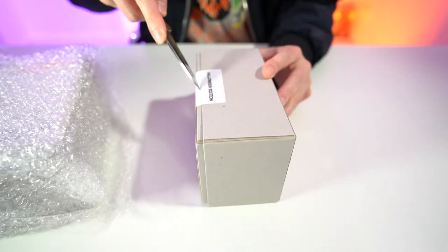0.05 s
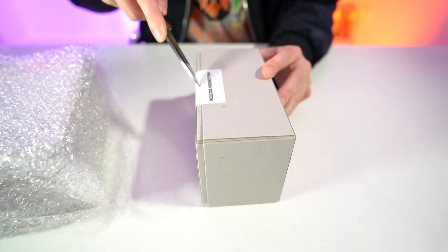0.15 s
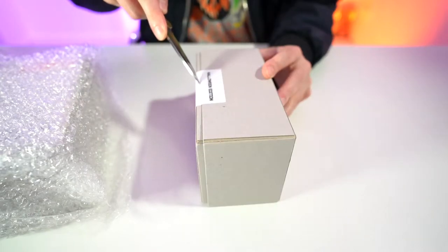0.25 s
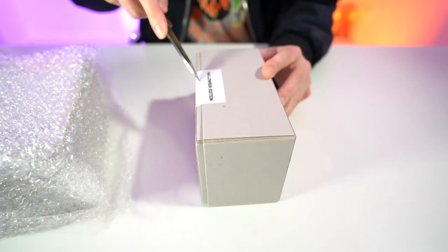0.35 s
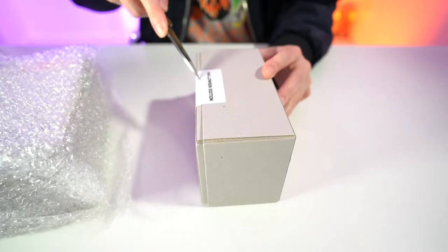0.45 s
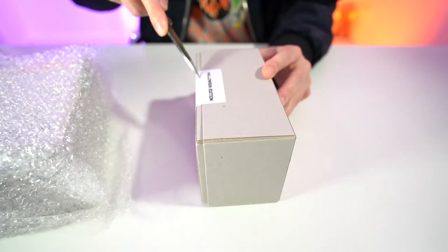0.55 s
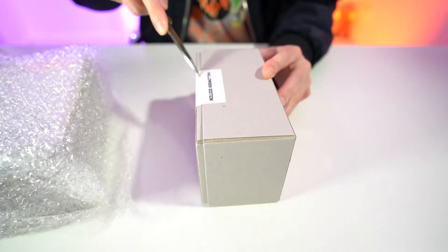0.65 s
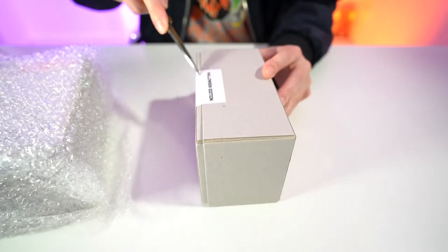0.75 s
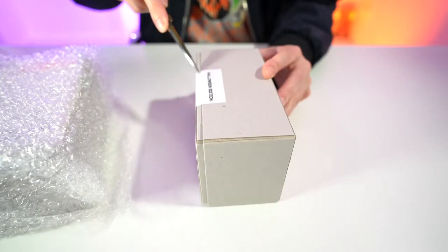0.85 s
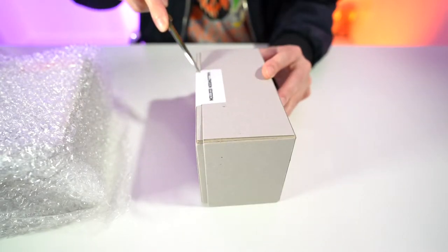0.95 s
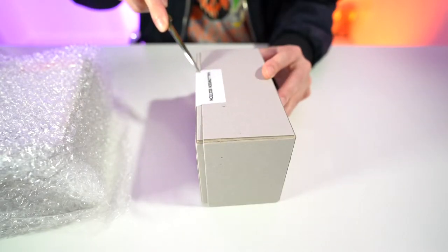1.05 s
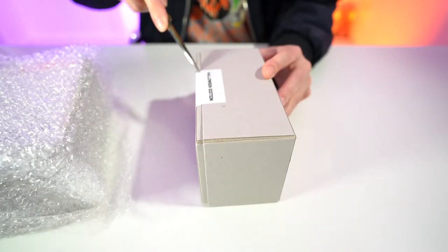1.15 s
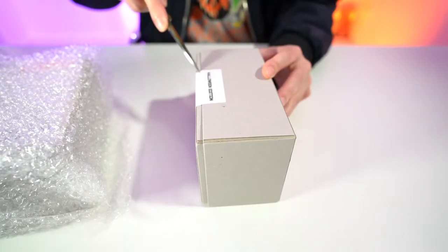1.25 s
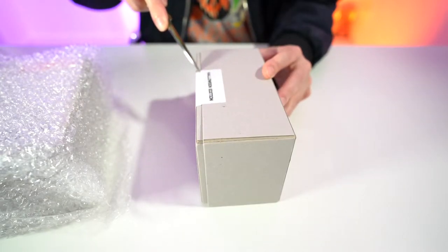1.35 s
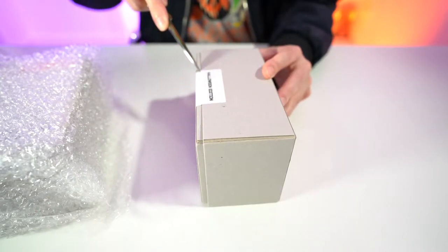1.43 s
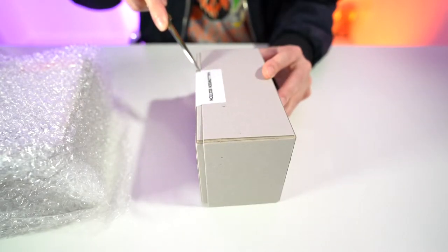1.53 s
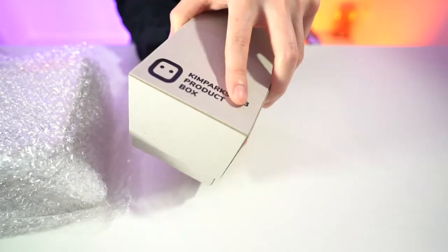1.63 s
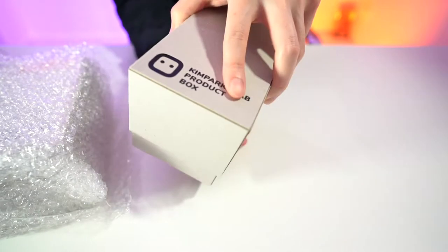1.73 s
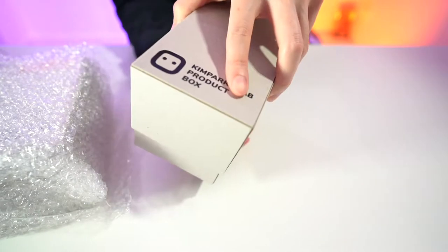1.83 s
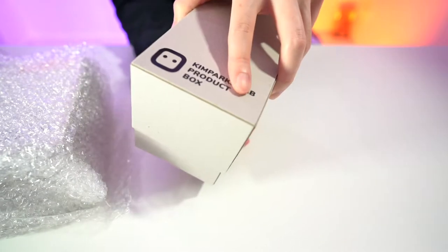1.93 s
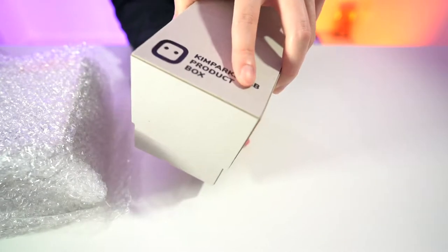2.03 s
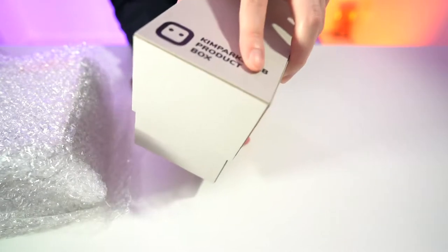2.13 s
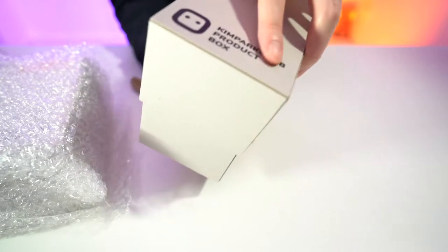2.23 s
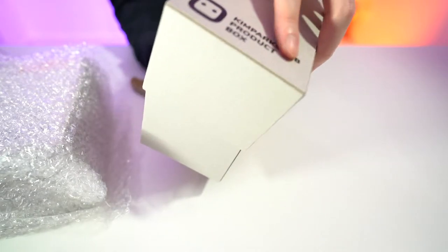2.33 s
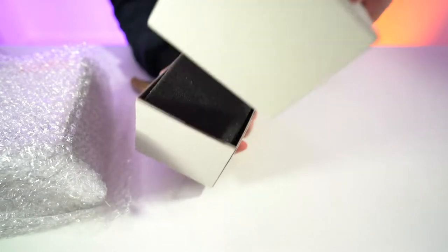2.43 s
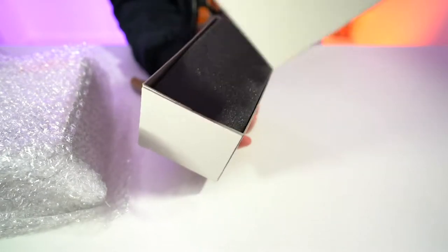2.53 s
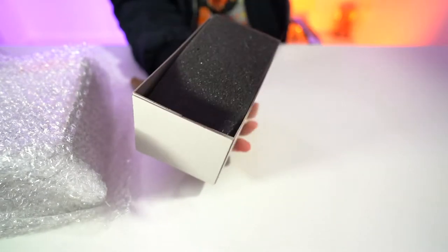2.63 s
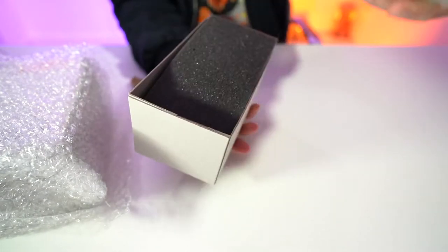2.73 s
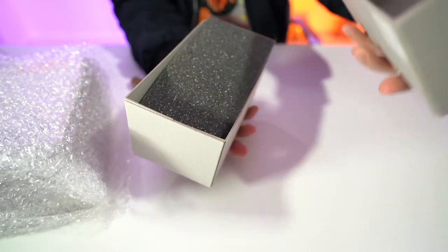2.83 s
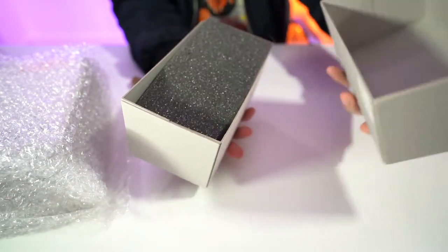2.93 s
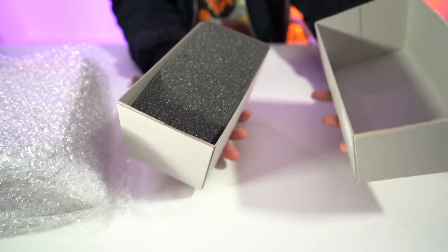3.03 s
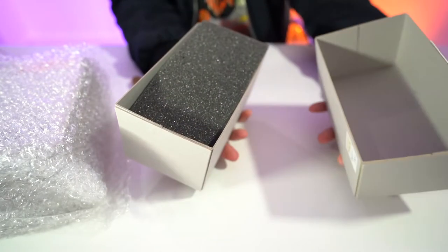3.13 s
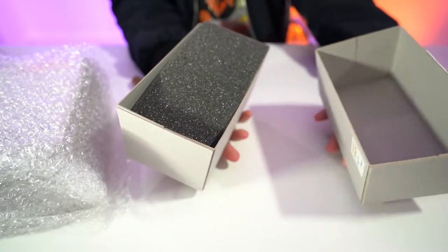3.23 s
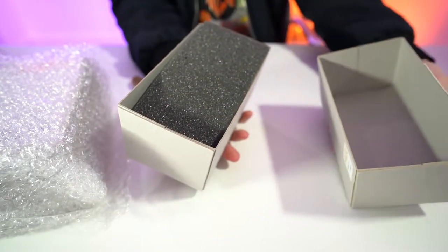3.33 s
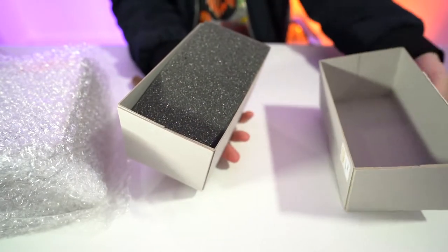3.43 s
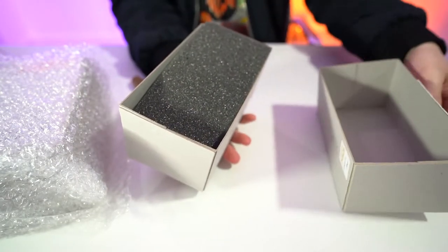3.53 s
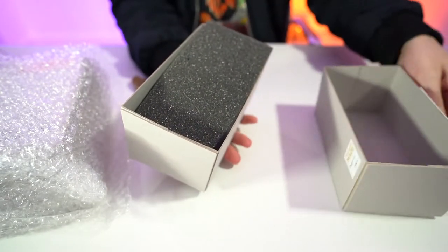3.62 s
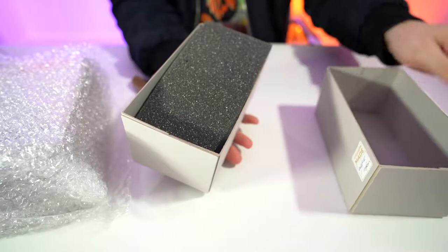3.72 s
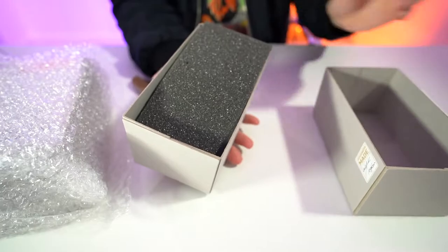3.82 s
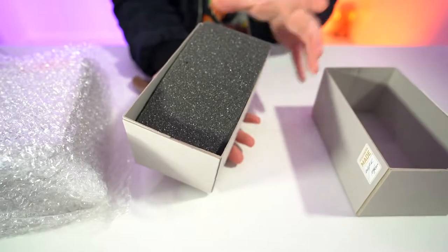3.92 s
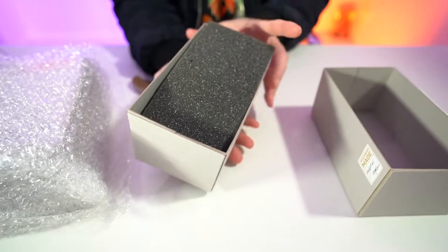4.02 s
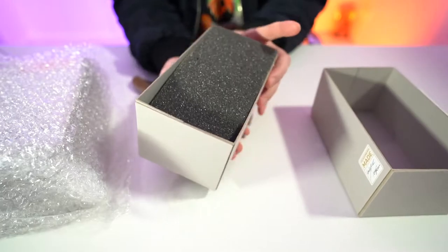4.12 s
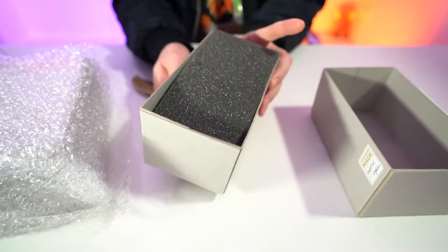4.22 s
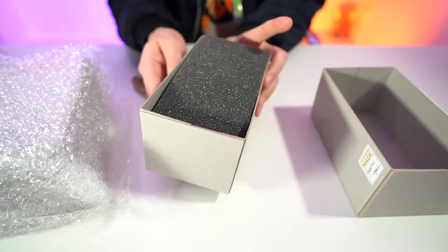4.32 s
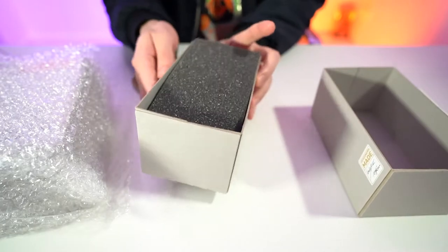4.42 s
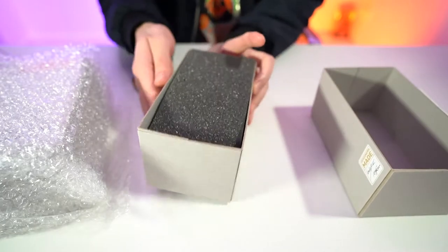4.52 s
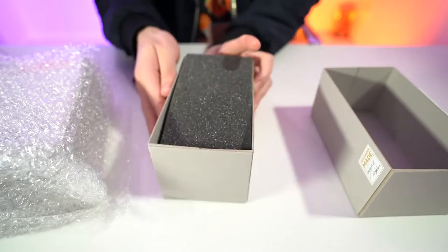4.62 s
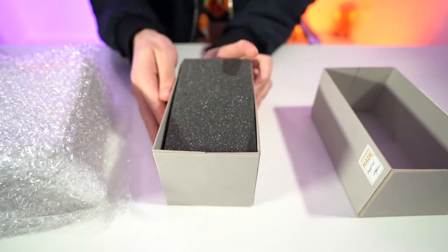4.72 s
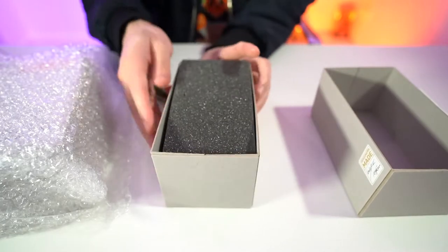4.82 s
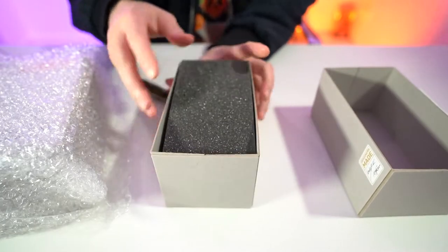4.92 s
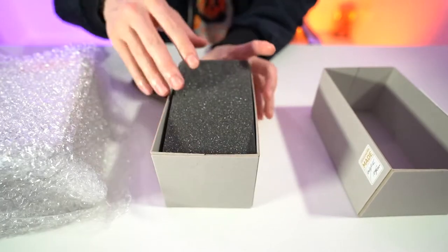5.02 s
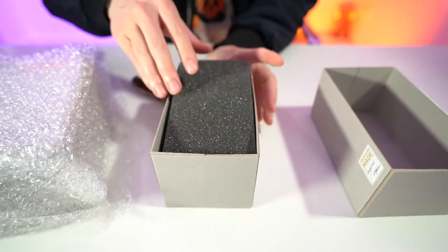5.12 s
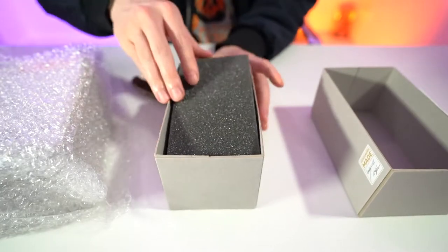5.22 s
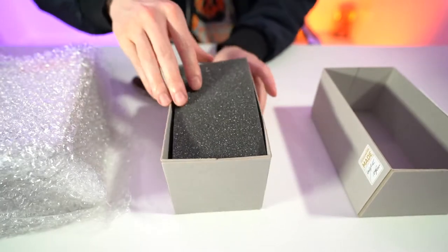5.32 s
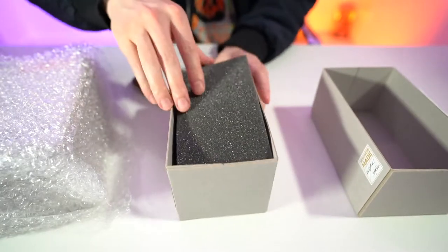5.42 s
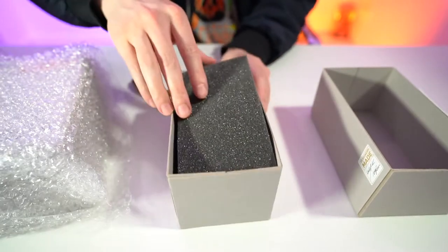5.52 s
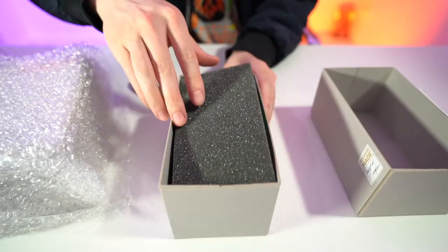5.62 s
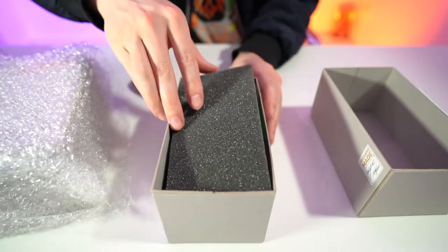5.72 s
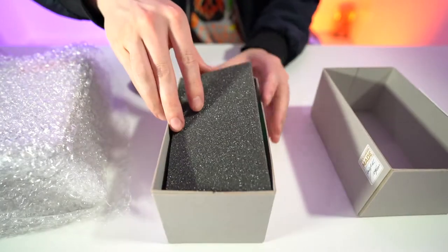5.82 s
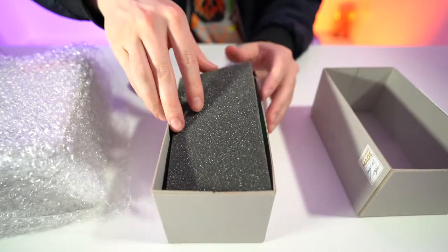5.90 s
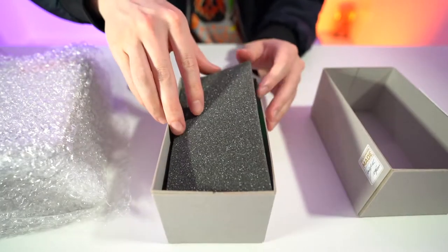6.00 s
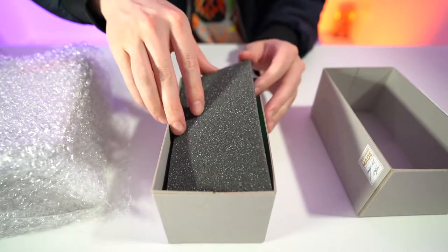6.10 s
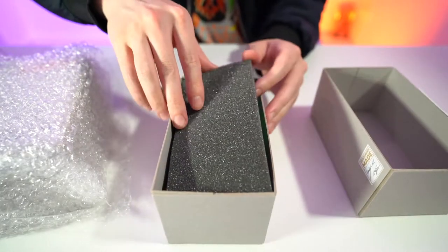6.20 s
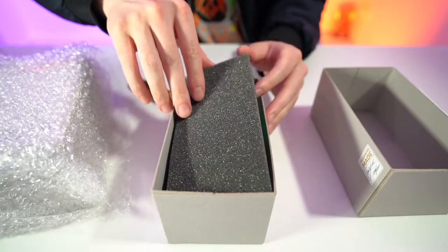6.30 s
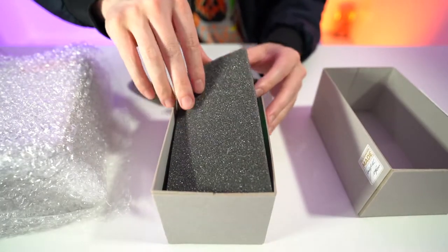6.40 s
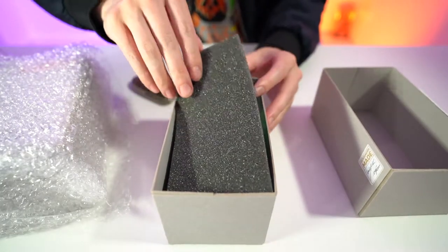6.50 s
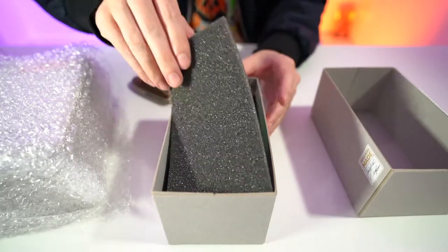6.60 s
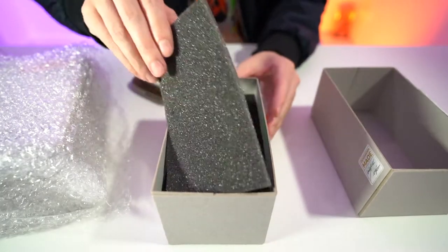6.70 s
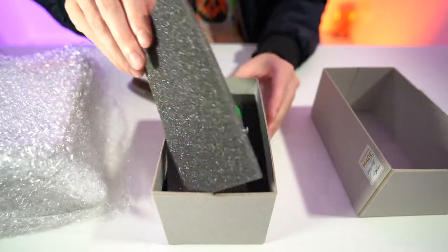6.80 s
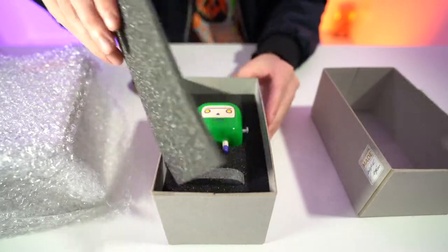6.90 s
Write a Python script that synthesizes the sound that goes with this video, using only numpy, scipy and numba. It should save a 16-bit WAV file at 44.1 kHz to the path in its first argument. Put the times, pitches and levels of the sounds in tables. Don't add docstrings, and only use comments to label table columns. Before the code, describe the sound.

Close-up box opening in a quiet room: scratchy slitting, rising cardboard scrape, clattering hollow lid, one firm tap, soft foam rustling.

```python
import sys
import numpy as np
from scipy import signal
from scipy.fft import rfft, irfft
from scipy.io import wavfile
from scipy.ndimage import uniform_filter1d
from numba import njit

SR = 44100
rng = np.random.default_rng(int(sys.argv[2]) if len(sys.argv) > 2 else 0)


def magnitude_from_level(level_db):
    exponent = np.asarray(level_db, float) / 20
    return 10 ** exponent


def wav_record(signal):
    frames = np.transpose(np.atleast_2d(signal))
    bounded = np.clip(frames, -1, 1)
    quanta = np.round(bounded * 32767).astype(np.int16)
    wavfile.write(sys.argv[1], SR, quanta)


N = 306698
T = np.arange(N) / SR


def unit(x):
    return x / np.sqrt(np.mean(x ** 2))


@njit
def moving_band(x, hz, width):
    y, b, l = np.empty(len(x)), 0., 0.
    for i in range(len(x)):
        g, k = np.tan(np.pi * hz[i] / SR), width / hz[i]
        v = (b + g * (x[i] - l)) / (1 + g * (g + k))
        b, l, y[i] = 2 * v - b, l + 2 * g * v, k * v
    return y


def band(x, hz, width):
    return moving_band(x, np.full(len(x), 1. * hz), 1. * width)


def bands(x, table):
    return sum(magnitude_from_level(db) * band(x, hz, width) for hz, width, db in table)


def colour(x, points, size=2048):
    hz, db = np.transpose(points)
    grid = np.maximum(np.arange(size // 2 + 1) * SR / size, 1)
    curve_db = np.interp(np.log(grid), np.log(hz), np.maximum(db, -70))
    cepstrum = irfft(curve_db * np.log(10) / 20)
    cepstrum[1:size // 2] *= 2
    cepstrum[size // 2 + 1:] = 0
    response = irfft(np.exp(rfft(cepstrum)))
    return signal.fftconvolve(x, response)[:len(x)]


def split(x, hz, kind):
    return signal.sosfilt(signal.butter(4, hz, kind, fs=SR, output="sos"), x)


def walk(rate):
    k = int(SR / rate)
    steps = np.repeat(rng.standard_normal(N // k + 1), k)
    return 1.3 * uniform_filter1d(steps, k)[:N]


def patchy(x, db):
    return unit(x) * magnitude_from_level(db * walk(70))


def curves(table):
    s, *columns = np.transpose(table)
    return [np.interp(T, s, c, left=-120, right=-120) for c in columns]


def peaks(s, db, rise, fall):
    rows = np.broadcast_arrays(s, db, rise, fall)
    coarse = T[::32]
    levels = [d - np.maximum(r * (at - coarse), f * (coarse - at)) for at, d, r, f in zip(*rows)]
    return np.max(levels, axis=0).repeat(32)[:N]


def grit(rate, spread_db, smooth):
    chance = rng.random((3, N))
    force = magnitude_from_level(-spread_db * np.log(chance[2] + .02))
    snaps = (chance[0] < rate / SR) * np.sign(chance[1] - .5) * force
    return unit(snaps) + smooth * rng.standard_normal(N)


def slips(rate, db, fall_s):
    chance = rng.random((2, N))
    starts = (chance[0] < rate / SR) * chance[1]
    jumps = signal.lfilter([1], [1, -np.exp(-1 / (fall_s * SR))], starts)
    return magnitude_from_level(db * jumps)


# (f/Hz, width/Hz, level/dB)
BOX_HOLLOW = [(93, 89, -4.5), (198.4, 23, -0.5), (259.7, 40.7, 5), (300, 134, 1.5), (375.7, 41, 5.5),
              (551, 104, 1.5), (648, 133, 6), (757, 330, -4), (871, 51, -1), (1190, 410, -9),
              (1165, 360, -10.5)]


def hollow(force):
    modes = enumerate(BOX_HOLLOW)
    return unit(sum((-1) ** k * magnitude_from_level(db) * band(force, hz, width) for k, (hz, width, db) in modes))


# (f/Hz, level/dB per Hz)
AIR_COLOUR = [(53, -8), (90, -5.5), (188, -6), (308, -12), (343, -8.5), (417, -19), (464, -15),
              (495, -13.5), (2020, -28.5), (8940, -36.5), (15700, -36)]
# (f/Hz, level/dB rms)
MACHINE_HUM = [(45, -64), (75, -69)]


def room_tone():
    air_db = -58 + 0.27 * walk(3.5)
    air = unit(colour(rng.standard_normal(N), AIR_COLOUR)) * magnitude_from_level(air_db)
    return air + sum(magnitude_from_level(db) * np.sqrt(2) * np.sin(2 * np.pi * hz * T) for hz, db in MACHINE_HUM)


# (t/s, sway level/dB, shake level/dB)
ARM_JOLTS = [(0.0, -33, -46), (0.12, -29, -56), (0.32, -28, -51), (0.46, -28, -49), (0.65, -34, -47),
             (0.79, -28, -50), (1.3, -27, -57), (2.52, -22, -27), (2.69, -25, -42), (2.84, -25, -54),
             (3.2, -33, -48), (3.39, -37, -32), (3.55, -34, -37), (3.74, -32, -30), (4.72, -28, -44),
             (4.8, -28, -55), (5.23, -37, -42), (5.36, -30, -44), (5.52, -36, -47), (5.96, -33, -57),
             (6.37, -33, -60), (6.46, -37, -55)]


def arm():
    s, sway_db, shake_db = np.transpose(ARM_JOLTS)
    sway_db = np.maximum(peaks(s, sway_db, rise=35, fall=45), -36)
    shake_db = np.maximum(peaks(s, shake_db, rise=130, fall=140), -59)
    swing = np.sin(2 * np.pi * np.cumsum(14 + 1.3 * walk(4)) / SR)
    wobble = unit(band(band(rng.standard_normal(N), 9, 6), 9, 6))
    sway = swing + .5 * wobble
    shake = split(band(rng.standard_normal(N), 26.5, 7.7), 49, "low")
    return split(magnitude_from_level(sway_db) * unit(sway) + magnitude_from_level(shake_db) * unit(shake), 48, "low")


# (t/s, bite level/dB, blade ring level/dB, let-go slope/dB per s)
BLADE_JERKS = [(0.0, -53, -76, 39), (0.09, -54, -60, 40), (0.175, -52, -62, 400), (0.286, -51, -63, 69),
               (0.422, -54.5, -54, 120), (0.53, -54.5, -52, 104), (0.692, -55, -55.5, 102),
               (0.79, -57.5, -61, 63), (0.916, -54.5, -71, 350.5)]
# (t/s, blade ring f/Hz, paper ring f/Hz)
BLADE_DEPTH = [(0.0, 3760, 1710), (0.19, 3750, 1790), (0.4, 4250, 1990), (0.77, 4300, 1840),
               (0.85, 4240, 1620), (1.5, 4300, 1740)]
# (f/Hz, width/Hz, level/dB)
PAPER_FLAP = [(2100, 170, -11), (3300, 1400, -13.5), (1140, 300, -10)]
# (f/Hz, level/dB per Hz)
SEAL_COLOUR = [(2940, -50), (5000, -8), (5240, -13), (6990, -15), (8420, -3), (10400, -19), (11300, -5),
               (12700, -2), (15700, 0)]
# (f/Hz, width/Hz, level/dB)
BLADE_MODES = [(8230, 1300, -4.5), (11350, 1200, -8.5), (13100, 1800, -11.5), (1900, 370, -6.5)]


def blade():
    s, bite_db, sing_db, fall = np.transpose(BLADE_JERKS)
    load, ring_steeper = 69, 2.8
    rasp_db = peaks(s, bite_db, load, fall)
    ring_db = peaks(s, sing_db, ring_steeper * load, ring_steeper * fall)
    boom_db, fine_db = rasp_db + 7.5, rasp_db - 1.5
    hz, paper_hz = uniform_filter1d(np.clip(curves(BLADE_DEPTH), 1500, 5000), size=3000)

    fibres = grit(rate=1600, spread_db=3.2, smooth=.5)
    force = patchy(fibres * slips(rate=150, db=7, fall_s=.0025), .8)
    rasp = moving_band(force, paper_hz, 350.0) + bands(force, PAPER_FLAP)
    ring = moving_band(force, hz, 240.0)

    fine = force + .7 * grit(rate=1600, spread_db=3.2, smooth=.5)
    fine = colour(fine, SEAL_COLOUR) + magnitude_from_level(-2) * bands(fine, BLADE_MODES[:3])
    fizz = patchy(split(fine, 10300, "high"), 2.4)
    fine = patchy(split(fine, 10300, "low"), 1.6) + magnitude_from_level(-4.5) * fizz
    boom = split(hollow(grit(rate=1500, spread_db=3.5, smooth=0.83)), 610, "low")

    cut = magnitude_from_level(rasp_db) * patchy(rasp, 0.9) + magnitude_from_level(ring_db) * patchy(ring, 1.4)
    cut += magnitude_from_level(boom_db) * patchy(boom, 2.04) + magnitude_from_level(fine_db - 2.5) * unit(fine)
    return cut + tears(hz)


# (t/s, peak level/dB)
FIBRE_TEARS = [(0.02, -40), (0.024, -47), (0.053, -51), (0.077, -38), (0.097, -49), (0.11, -43),
               (0.139, -41), (0.165, -46), (0.17, -48), (0.178, -48), (0.217, -46), (0.233, -46),
               (0.249, -44), (0.276, -45), (0.282, -49), (0.301, -41.5), (0.322, -42), (0.345, -44),
               (0.381, -37.5), (0.39, -43), (0.414, -51), (0.42, -46), (0.436, -45), (0.443, -51),
               (0.502, -44), (0.515, -43), (0.525, -43), (0.532, -43), (0.554, -53), (0.573, -51),
               (0.577, -46), (0.614, -43), (0.63, -43), (0.644, -46), (0.656, -49), (0.667, -49),
               (0.678, -47), (0.689, -50), (0.696, -46), (0.731, -44.5), (0.7466, -42), (0.791, -43.5),
               (0.798, -40.5), (0.836, -48), (0.863, -47), (0.874, -48), (0.9, -48), (0.904, -49),
               (0.917, -50), (0.937, -46), (1.0075, -52.5), (1.054, -63), (1.255, -58), (1.303, -41.5),
               (1.359, -36.5), (1.3657, -51.5), (1.3715, -43), (1.395, -59)]


def tears(blade_hz):
    s, peak_db = np.transpose(FIBRE_TEARS)
    t = T[:400]
    shape = np.exp(-t / .0012) * np.minimum(t / 0.00028, 1)
    bursts = rng.standard_normal((len(s), len(t))) * shape
    force = np.zeros(N)
    for at, db, rip in zip(s, peak_db, bursts):
        start = int(at * SR)
        force[start:start + len(t)] += magnitude_from_level(db + 6.5) * rip / np.sqrt(np.mean(rip[:100] ** 2))
    paper = magnitude_from_level(-14) * colour(force, SEAL_COLOUR)
    return paper + magnitude_from_level(3) * moving_band(force, blade_hz, 330.) + bands(force, BLADE_MODES)


# (f/Hz, level/dB per Hz)
BOARD_COLOUR = [(590, 1.5), (1000, 4), (1270, 2), (1620, -1.5), (2370, -1), (2570, -4.5), (2880, -2),
                (4730, -5), (6030, -10.5), (8520, -10), (10400, -21.5), (13200, -15.5), (15700, -21.5)]
# (t/s, peak level/dB, body thud level/dB, thud f/Hz)
SNAP_TICKS = [(1.0073, -48, 0, 527), (1.303, -46, 0, 580), (1.3585, -48, 4, 577), (1.372, -47, 8, 650),
              (1.636, -56, -15, 600), (3.5325, -31.5, -23, 1980), (3.665, -36, -8, 895),
              (3.334, -36.5, 7.5, 1485), (3.336, -42, 6, 1950), (1.6329, -47, 10, 713),
              (2.716, -44.5, 6.5, 803), (2.7744, -54, -13, 880), (3.1241, -45, 5, 730),
              (3.888, -52, 12, 416), (4.069, -44.5, 4, 1460), (4.1794, -56, -6, 510),
              (4.3006, -37, -2, 533), (4.828, -44.5, 5.5, 657), (5.174, -46, -5, 624), (5.196, -48, 9, 553),
              (5.3877, -41, -6, 610), (6.037, -40.5, -1, 925), (6.4513, -41, -10, 640),
              (6.7286, -31, -6, 606), (5.622, -44, 6.5, 1760), (6.4645, -40, -4, 1980),
              (6.476, -46, -6, 2000), (6.49, -49, -13, 3020), (6.5497, -31, -6, 4710),
              (6.555, -34, -2, 1900), (6.604, -42, -13, 2020), (6.645, -43.5, -4, 1500),
              (6.805, -39, -4, 1900), (6.815, -37.5, -2, 2020), (6.826, -40, 0, 1100),
              (6.843, -38, 1, 1290), (6.856, -36, 4, 1400), (6.868, -39, 0, 1500), (6.889, -44.5, -1, 1900),
              (6.901, -43, -11, 1500), (5.61, -44, 4, 600), (6.766, -35, -23, 665)]


def ticks(snap_s=0.0021, thud_s=0.0047):
    out, t = np.zeros(N + SR), np.arange(4096) / SR
    for s, peak_db, thud_db, hz in SNAP_TICKS:
        snap = colour(rng.standard_normal(len(t)) * np.exp(-t / snap_s), BOARD_COLOUR)
        snap = split(snap, 1260, "high")
        thud = np.sin(2 * np.pi * hz * t) * np.exp(-t / thud_s)
        start = int(s * SR)
        out[start:start + len(t)] += magnitude_from_level(peak_db) * (snap / np.abs(snap).max() + magnitude_from_level(thud_db) * thud)
    return out[:N]


def strokes(table, contact):
    out = np.zeros((5, N))
    ring_db, fine_db, boom_db, top_db, touch, lift = contact
    touch, lift = max(touch, .004), max(lift, .015)
    for s, length, db, swell_db, walls_db in table:
        end = s + length
        at = slice(int((s - touch) * SR), int((end + lift) * SR))
        shape_db = np.interp(T[at], [s - touch, s, end, end + lift], [-30, 0, swell_db, swell_db - 30])
        layers_db = db + np.array([[0], [walls_db + ring_db], [fine_db], [walls_db + boom_db], [top_db]])
        out[:, at] = np.maximum(out[:, at], magnitude_from_level(layers_db + shape_db))
    return out


# (t/s, length/s, pressure level/dB, swell/dB, share into the walls/dB)
DESK_STROKES = [(1.3, .025, -72, -9, 20), (1.36, 0.08, -62, -17, 13.5), (1.568, 0.045, -62, -10, 10.5),
                (2.6, 0.14, -65, 8, -2), (3.335, 0.15, -50, -2.5, 4), (3.666, 0.031, -46, 0.5, 13),
                (3.715, 0.0065, -47, -1, 9), (4.0, 0.079, -60.5, 4, -3.5), (4.301, 0.02, -47, -15.5, -1.5),
                (4.4, 0.31, -59.5, 5.5, -17), (4.635, 0.11, -51, -8, -10)]
SLEEVE_STROKES = [(2.82, 0.065, -62, 2, -12), (3.08, 0.14, -63.5, -2, -23), (3.27, 0.074, -61, -5, -21),
                  (3.355, 0.16, -57, 2.5, -17), (3.56, .035, -55.5, 9, -3), (3.595, 0.034, -48.5, -4.5, -3),
                  (3.5, 0.023, -53, -2, -20), (3.715, 0.01, -66, -7, -20), (1.635, 0.0093, -57, -6, -20),
                  (3.86, 0.036, -64.5, -1.5, -20), (4.165, 0.11, -52.5, -4.5, -7.5),
                  (4.305, 0.025, -53.5, -5, -17), (4.335, 0.074, -59.5, -4, -20), (4.53, .17, -63, 0, -20),
                  (4.78, 0.039, -59, -5, -22)]
FINGER_STROKES = [(2.45, 0.15, -58.5, -8.5, 1), (2.745, 0.2, -58.5, 0.5, -6), (2.95, 0.34, -61.5, 0.5, -12),
                  (3.5, 0.042, -51.5, 9.5, -4), (3.54, 0.022, -47, -5, 17), (3.745, 0.24, -56, -6, 2.5),
                  (4.07, 0.1, -50, -7, -13), (4.75, 0.088, -56, 1.5, -1), (4.86, 0.29, -62, -3, -4),
                  (3.25, 0.068, -58.5, 0, -19), (4.32, 0.084, -59.5, -4, -11),
                  (5.175, 0.26, -60, 1.5, -4.5), (5.386, 0.27, -56, 5, -6), (5.62, 0.32, -51.5, -12.5, -7),
                  (5.93, 0.086, -63, 6.5, -1.5), (6.035, 0.065, -53, -8, -3)]
FOAM_STROKES = [(6.11, 0.055, -60, -2, 1), (6.168, 0.096, -51.5, 1, -2.5), (6.26, 0.1, -49, -4.5, -2.5),
                (6.36, 0.095, -56, -4.5, -2), (6.5, 0.047, -58.5, 0, 2), (6.57, 0.042, -56, -2.5, 4.5),
                (6.61, .04, -64, -5, 4), (6.65, 0.124, -54, 4, 1), (6.775, 0.027, -56.5, 1, -5),
                (6.812, 0.086, -50.5, 0, -0.5)]
EDGE_SNAGS = [(6.453, .08, -50, -7, 2), (6.538, .016, -50, 8, 0), (6.555, .02, -44, -12, 0)]
# (wall ring level/dB, fine hiss level/dB, deep boom level/dB, top fizz level/dB, touch/s, lift/s)
WOOD_CONTACT = (-7, -5.5, 0.5, -21, 0.055, 0.0259)
CLOTH_CONTACT = (3, -0.5, -19, -5.5, -0.03, -0.14)
SKIN_CONTACT = (1.5, -4.5, -17, -16.5, -0.0157, -0.01)
FOAM_CONTACT = (1, -8, -18, -5.5, 0.04, -0.1)
EDGE_CONTACT = (1.5, -10.5, -23, -9.5, 0, 0.09)


def rubbing():
    contacts = [(FINGER_STROKES, SKIN_CONTACT), (DESK_STROKES, WOOD_CONTACT), (SLEEVE_STROKES, CLOTH_CONTACT),
                (FOAM_STROKES, FOAM_CONTACT), (EDGE_SNAGS, EDGE_CONTACT)]
    gains = np.sqrt(slide() ** 2 + sum(strokes(*contact) ** 2 for contact in contacts))
    force = patchy(grit(rate=3000, spread_db=3.5, smooth=1.1), .9)
    foam_s = 6.12
    cells = .35 * (T > foam_s) * grit(rate=350, spread_db=4.5, smooth=0)
    board, walls = colour(force + cells, BOARD_COLOUR), hollow(force)

    low, high = split(board, 5800, "low"), split(board, 5800, "high")
    dull_rasp = patchy(split(low, 2030, "low"), 0.96)
    bright_rasp = patchy(split(low, 1570, "high"), 0.98)
    rasp = magnitude_from_level(1.13) * unit(dull_rasp + magnitude_from_level(2.5) * bright_rasp)
    ring = unit(patchy(split(walls, 285, "high"), 1.6))
    hiss = unit(patchy(split(high, 10300, "low"), 0.37))
    boom = unit(split(walls, 285, "low"))
    fizz = unit(patchy(split(high, 10300, "high"), 0.42))
    return sum(gain * layer for gain, layer in zip(gains, (rasp, ring, hiss, boom, fizz)))


# (t/s, speed level/dB)
LID_SLIDE = [(1.62, -64), (1.64, -54.5), (1.686, -47), (1.79, -55), (1.86, -55.5), (1.95, -47),
             (2.118, -43), (2.25, -44), (2.412, -38)]


def slide():
    speed_db, = curves(LID_SLIDE)
    grip_s, grip_db = LID_SLIDE[1]
    held_db = np.minimum(2 * (speed_db - grip_db), 0)
    ring_db = -47.5 + held_db
    boom_db = -43 - 2 * (T - grip_s) + held_db
    fine_db = speed_db - 7 + 0.22 * (speed_db - LID_SLIDE[-2][1])
    gains = magnitude_from_level(np.array([speed_db, ring_db, fine_db, boom_db, fine_db - 11.5]))
    return uniform_filter1d(gains, size=400)


CONTACT_CRACK_DB = {"flat": -35, "edge": -22.5, "corner": -13, "scuff": 0}


def knocks(events, modes, push_s, crack_s):
    out, t = np.zeros(N + SR), np.arange(SR // 2)[:, None] / SR
    hz, db, t60 = np.transpose(modes)
    push = np.hanning(int(push_s * SR) + 3)
    lag_s = .0015
    for s, peak_db, ring, bright_db, struck_hz, contact in events:
        spot = rng.standard_normal((3, len(hz)))
        phase = 2 * np.pi * hz * (1 + .01 * spot[0]) * t + .9 * spot[2]
        tones = np.sin(phase) * np.exp(-np.log(1000) * t / (t60 * max(ring, .1)))
        strike_db = db + bright_db * np.log2(hz / 400) + 1.5 * spot[1]
        strike_db += 8 * np.exp(-(np.log2(hz / struck_hz) / 0.13) ** 2)
        body = np.convolve(tones @ magnitude_from_level(strike_db), push)[:len(t)]
        body = split(body, 85, "high")
        crack = colour(rng.standard_normal(len(t)) * np.exp(-t[:, 0] / crack_s), BOARD_COLOUR)
        blow = body / np.abs(body).max() + magnitude_from_level(CONTACT_CRACK_DB[contact]) * crack / np.abs(crack).max()
        start = int((s + lag_s) * SR)
        out[start:start + len(t)] += magnitude_from_level(peak_db) * blow
    return out[:N]


# (t/s, peak level/dB, ring time factor, brightness/dB per octave, favoured f/Hz, contact)
BOX_TAPS = [(2.374, -16.5, 0.17, 6, 300, "corner"), (2.384, -57, 0.33, 15, 1290, "edge"),
            (4.636, -9, 0.4, 0.5, 292, "flat"), (4.644, -21.5, 2.4, -10, 407, "flat"),
            (4.661, -16.5, 0.59, -16, 404, "flat"), (5.621, -26.5, 0.65, -1, 860, "corner"),
            (5.631, -35.5, 0.77, -8, 860, "edge"), (6.551, -26.5, 0.45, 3.5, 404, "corner"),
            (6.557, -29, 1.4, -3, 875, "corner")]
# (f/Hz, level/dB, time to fall 60 dB/s)
BOX_MODES = [(115, -17, 0.077), (470, -1, 0.055), (275, 5, 0.093), (404, 14, 0.044), (553, 12.5, 0.068),
             (690, 6, 0.1), (860, 19.5, 0.026), (1085, 13.5, 0.061), (1290, -41, 0.026), (198, -28, 0.18)]


def box_taps():
    return knocks(BOX_TAPS, BOX_MODES, push_s=0.00086, crack_s=0.0016)


# (t/s, length/s, f/Hz, level/dB)
WALL_SQUEAKS = [(2.718, 0.03, 814, -54), (2.771, 0.025, 3280, -58), (2.774, 0.017, 890, -48),
                (3.031, .17, 370, -52), (2.8, .15, 375, -54), (2.72, .14, 210, -52), (3.15, .12, 385, -55),
                (3.166, 0.035, 2020, -55), (3.171, 0.043, 3650, -54), (6.035, .06, 2200, -55),
                (6.037, .065, 4650, -49), (6.04, .07, 3250, -51), (6.453, 0.085, 2050, -47),
                (6.455, 0.04, 624, -43), (6.478, 0.059, 4870, -52), (6.68, 0.06, 680, -47),
                (6.86, .04, 1250, -46), (6.545, .02, 4700, -45), (3.535, .05, 2350, -42),
                (3.28, .15, 5600, -58), (6.808, 0.063, 2000, -49), (6.845, 0.03, 1400, -46)]


def squeaks():
    out, t = np.zeros(N), T[:8192]
    for s, length, hz, db in WALL_SQUEAKS:
        shape = np.clip(np.minimum(t / 0.0013, 3 - 3 * t / length), 0, 1)
        catch = rng.standard_normal(8192) * shape
        start = int(s * SR)
        ring = band(catch, hz, 70 + hz / 24)[:N - start]
        out[start:start + 8192] += magnitude_from_level(db + 4.0) * ring / np.abs(ring).max()
    return out


# (t/s, peak level/dB, ring time factor, brightness/dB per octave, favoured f/Hz, contact)
LID_BOUNCES = [(3.296, -30.5, 1.2, -11, 319, "edge"), (3.333, -4.5, 1.09, -2.5, 223, "flat"),
               (3.531, -10, 1.5, 4.5, 395, "corner"), (3.545, -13, 0.81, -5.5, 300, "flat"),
               (3.570, -15.5, 0.43, 2.5, 404, "edge"), (3.662, -36, 0.48, 6, 805, "scuff"),
               (3.677, -9, 0.24, 5.5, 600, "edge"), (3.696, -12, 0.44, 5, 902, "edge"),
               (3.710, -21.5, 0.7, -12, 326, "edge"), (3.741, -13.5, 0.56, 3.5, 894, "edge"),
               (3.748, -15, 0.5, -3, 334, "flat")]
# (f/Hz, level/dB, time to fall 60 dB/s)
LID_MODES = [(102, -11.5, 0.46), (214, -42, 0.123), (235.2, 3.5, 0.16), (309.3, 5.5, 0.075),
             (381, 2.5, 0.17), (451, 4.5, 0.069), (537, 2, 0.09), (600, -4, 0.097), (670, -6, 0.081),
             (824, -8.5, 0.094), (902, -1, 0.052), (1283, -14, 0.1), (1414, -24, 0.089), (2280, -11, 0.065)]


def lid_bounces():
    return knocks(LID_BOUNCES, LID_MODES, push_s=0.00054, crack_s=0.0059)


def room(x, t60=0.25, wet_db=-14, dull_hz=3000):
    t = np.arange(SR // 2) / SR
    tail = rng.standard_normal(len(t)) * np.exp(-np.log(1000) * t / t60) * np.minimum(t / .006, 1)
    tail = band(tail, 555, dull_hz)
    return x + magnitude_from_level(wet_db) * signal.fftconvolve(x, tail / np.sqrt(np.sum(tail ** 2)))[:N]


def scene():
    desk = blade() + ticks() + rubbing() + box_taps() + squeaks() + lid_bounces()
    return (room(desk) + arm() + room_tone())[None]


def low_pass(x):
    return signal.sosfilt(signal.butter(12, 15830, fs=SR, output="sos"), x)


def record(dry):
    top_cut = signal.ellip(8, .2, 70, 15800, fs=SR, output="sos")
    mix = signal.sosfilt(top_cut, dry)
    return low_pass(mix)


dry = scene()
out = record(dry)
wav_record(out)
```